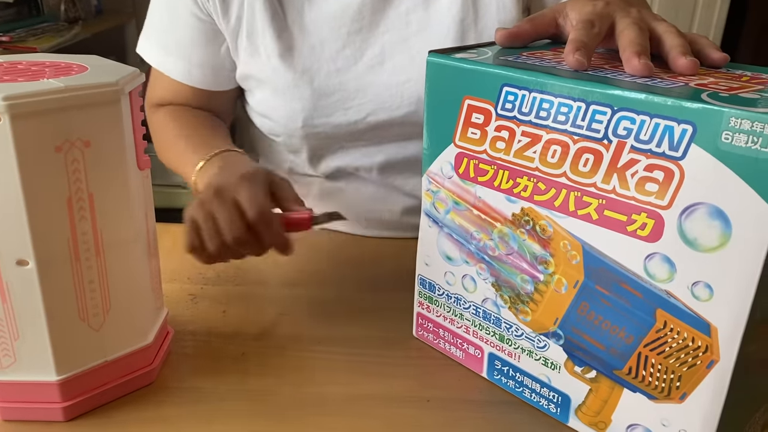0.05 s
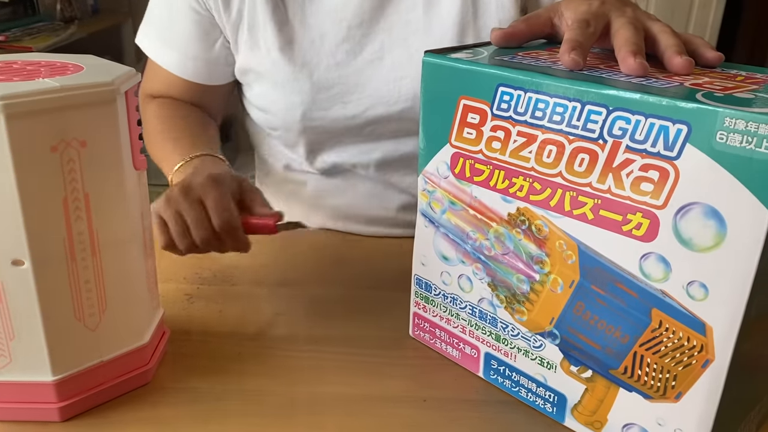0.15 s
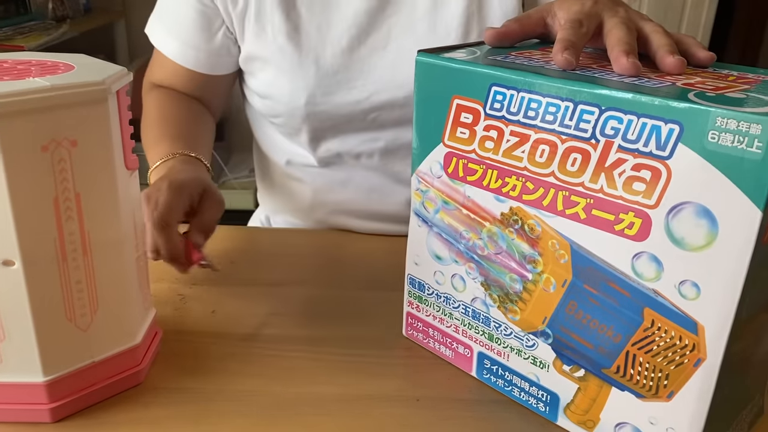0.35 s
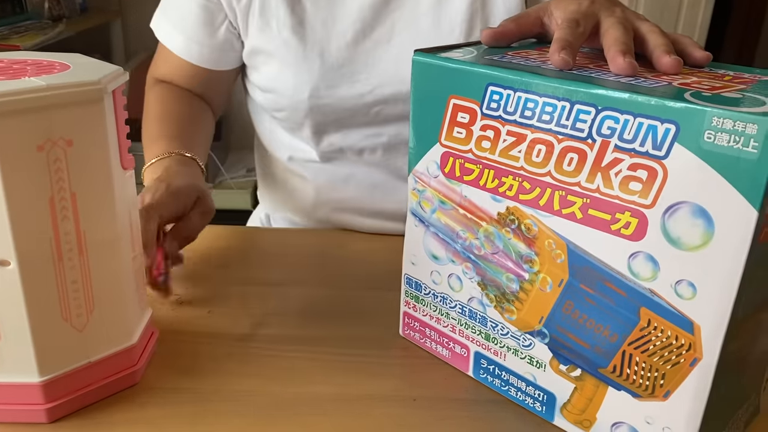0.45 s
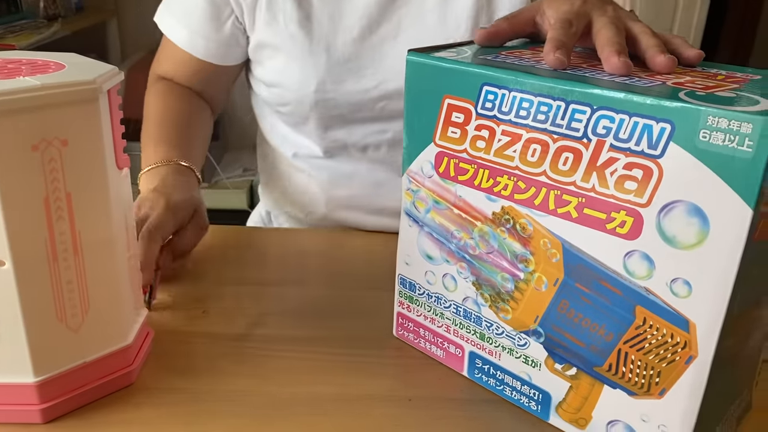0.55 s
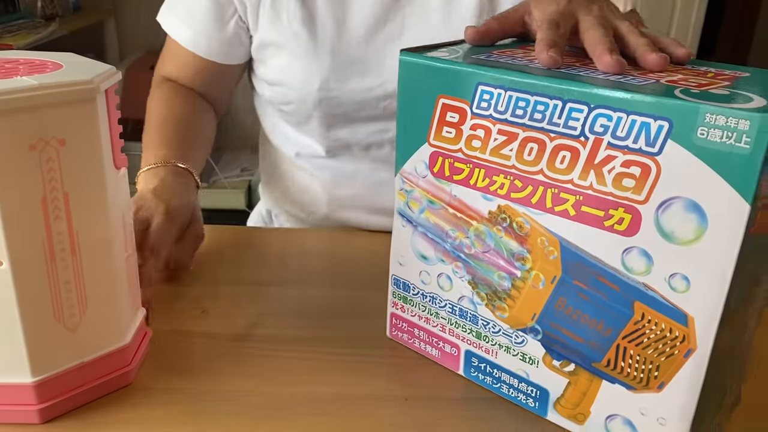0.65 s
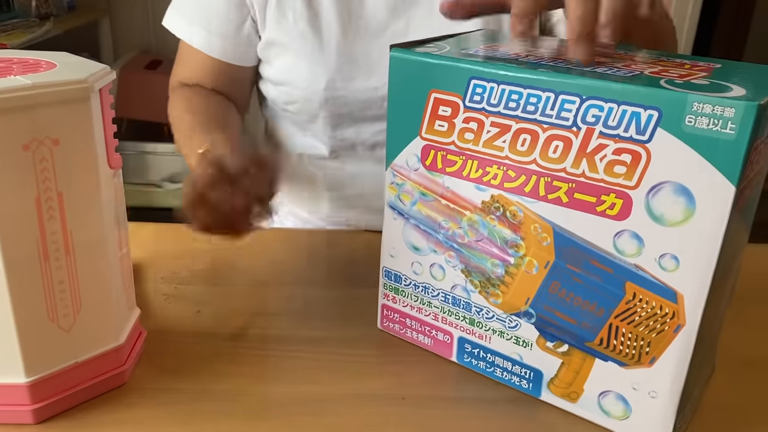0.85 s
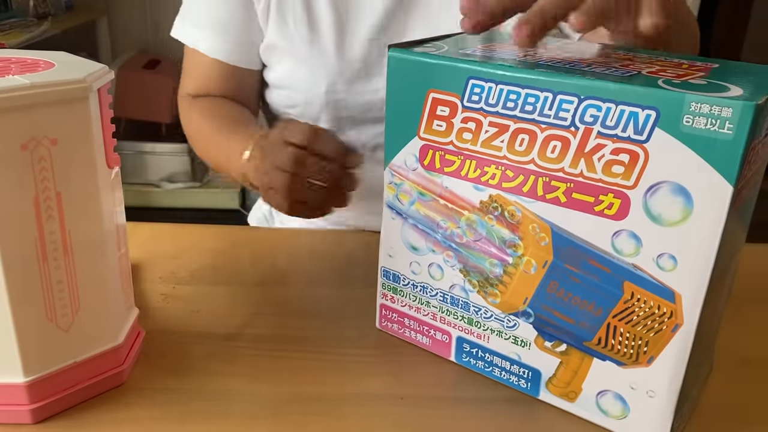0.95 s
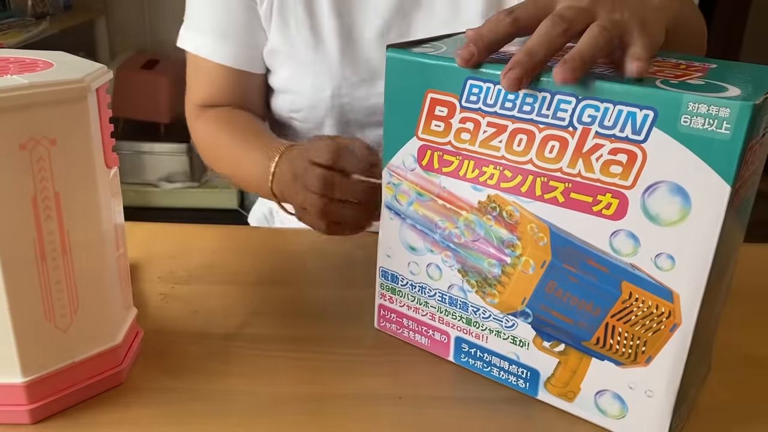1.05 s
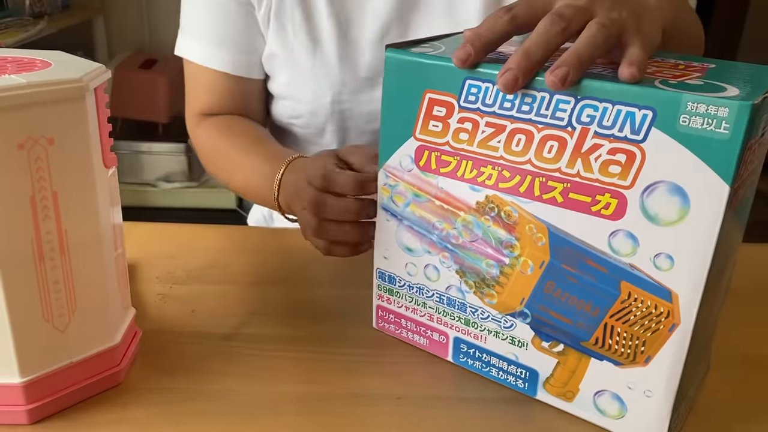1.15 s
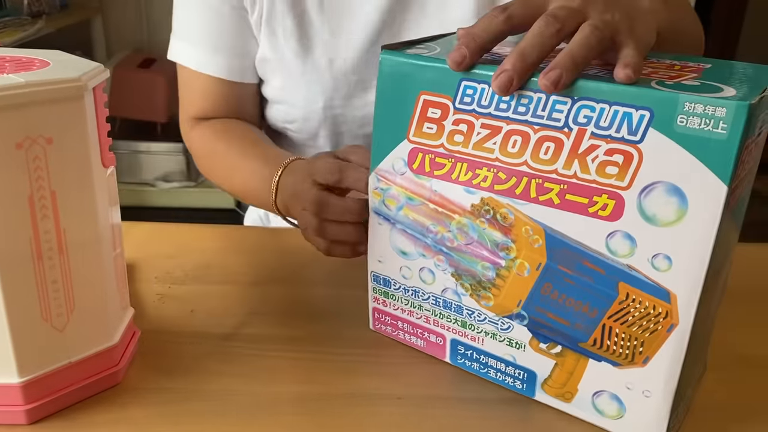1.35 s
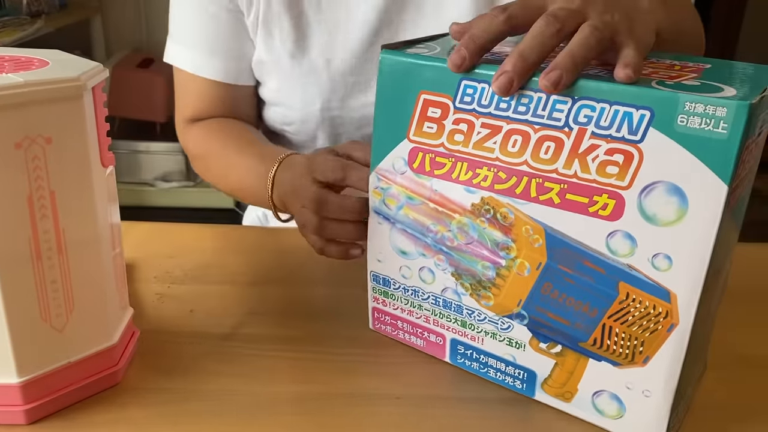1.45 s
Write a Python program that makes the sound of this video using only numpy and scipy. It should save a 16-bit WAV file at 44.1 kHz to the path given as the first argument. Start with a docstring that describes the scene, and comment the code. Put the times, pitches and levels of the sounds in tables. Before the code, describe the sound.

Quick cutter blade clicks, a clatter on wood, and hollow bumps of a cardboard box.

```python
"""A snap-off cutter's blade slides back, its spring clicking into nine notches and ringing the handle.
The cutter then drops on a wooden table and rattles to rest, each bounce sounding wood and plastic.
A hand shifts a large cardboard box, which lands on two edges so that its big panels boom.
There are light ticks and soft rubs. It is all heard close by, in a small, lively room with a low hum."""
import sys
import numpy as np
from scipy import signal
from scipy.fft import rfft, irfft
from scipy.io import wavfile

SR = 44100
rng = np.random.default_rng(int(sys.argv[2]) if len(sys.argv) > 2 else 0)


def wrap_up_sound(samples):
    """Save the sound to the file named by the first command line argument, as 16-bit audio."""
    columns = np.atleast_2d(samples).T
    # keep every value between -1 and 1, then stretch to whole-number steps
    tamed = np.clip(columns, -1, 1)
    steps = np.round(tamed * 32767).astype(np.int16)
    wavfile.write(sys.argv[1], SR, steps)


N = 66150
T = np.arange(SR // 4) / SR  # the clock for one short sound, in seconds


def amp(db):
    """Turns decibels (dB) into a number to multiply by."""
    return 10 ** (np.asarray(db) / 20)


def unit(x):
    """Scales a sound so that its channels have an average energy of one."""
    return x / np.sqrt(np.mean(np.sum(x ** 2, -1)) + 1e-20)


def read(points, hz):
    """Reads between the rows of a table, giving every octave equal space."""
    f, value = np.transpose(points)
    return np.interp(np.log(hz + 1), np.log(f + 1), value)


def add(mix, start, sound):
    """Mixes a sound in at its start time in seconds."""
    part = mix[:, round(start * SR):][:, :sound.shape[-1]]
    part += sound[..., :part.shape[1]]


def colour(x, points, size=4096):
    """Makes each frequency louder or softer as a table says, with no sound ahead of its cause."""
    log_gain = np.log(amp(read(points, abs(np.fft.fftfreq(size, 1 / SR)))))
    taps = np.fft.ifft(np.exp(np.conj(signal.hilbert(log_gain)))).real[:size // 2]
    return signal.fftconvolve(x, taps[None], axes=1)[:, :x.shape[1]]


def dull(x, hz):
    """Gently softens the treble above hz: a higher value leaves a brighter sound."""
    r = np.exp(-2 * np.pi * hz / SR)
    return signal.lfilter([1 - r], [1, -r], x)


def noise(count, width):
    """Left and right noise: the same at width 0, unrelated at width 1."""
    mid, side = rng.standard_normal((2, count))
    return np.array([mid + width * side, mid - width * side])


def fade(t, fade_s):
    """Stays full until t is zero, then falls by 60 dB in each fade time, fade_s."""
    return np.exp(-np.log(1000) * np.maximum(t, 0) / fade_s)


def burst(tone, hold_s, fade_s, width):
    """A contact chatters for a moment, then dies away in so many tones that they blur into noise."""
    return unit(colour(noise(len(T), width) * fade(T - hold_s, fade_s), tone))


def ring(tones, spread_db=0, detune=0):
    """A struck object's fading tones; spread_db and detune vary their strength and pitch by chance."""
    hz, db, fade_s = np.transpose(tones)[:, :, None]
    strength, shift = rng.standard_normal((2, *hz.shape))
    phase = 2 * np.pi * hz * (1 + detune * shift) * T + np.pi * np.arange(len(hz))[:, None]
    rise = 1 - np.exp(-T / 0.0003)
    loudness = amp(db + spread_db * strength) * fade(T, fade_s) * rise
    return unit((loudness * np.sin(phase)).sum(0))


def pan(x, balance):
    """Leans each frequency to the left or right."""
    lean_db = read(balance, np.fft.rfftfreq(N, 1 / SR))
    return irfft(rfft(x) * amp(np.outer([.5, -.5], lean_db)), N)


def out_of_step(x):
    """Sound reaches two closely spaced microphones slightly out of step."""
    # Each row: frequency in Hz, angle in radians by which the left side leads.
    left_lead = [(330, -1.14), (600, 1.58), (1500, 1.5), (2600, 0.77), (4200, 0), (5300, -1.9),
                 (6200, -0.75), (7900, 4), (9700, 0.13), (10900, -1.1), (11900, -4.5), (13700, -5),
                 (16000, -9.5)]
    angle = read(left_lead, np.fft.rfftfreq(N, 1 / SR))
    return irfft(rfft(x) * np.exp(.5j * np.outer([1, -1], angle)), N)


def room(x, tail_db):
    """The room adds a few near echoes and a tail of many blurred ones."""
    # Each row: delay in seconds, left gain, right gain.
    echoes = [(.0092, 0.14, 0.14), (0.0202, -.06, .07)]
    # Each row: frequency in Hz, the tail's fade time in seconds.
    fade_times = [(120, 0.22), (300, 0.38), (700, 0.21), (4000, 0.24), (15000, 0.26)]
    # Each row: frequency in Hz, the tail's boost or cut in dB.
    tail_tone = [(120, -2.5), (290, -10.5), (520, 2.5), (1200, 1.5), (3000, 2.5), (10000, -0.5), (12000, 3),
                 (14000, -0.5)]
    hiss = noise(SR, width=0.54)
    grains = np.sign(hiss) * abs(hiss) ** 1.56  # a power above 1 makes single echoes stand out
    hz, t, bands = signal.stft(grains, SR, nperseg=256)
    bands = bands + (bands.mean(0) - bands) / (1 + (hz[:, None] / 350) ** 4)  # centres the bass
    tail = signal.istft(bands * fade(t, read(fade_times, hz)[:, None]), SR, nperseg=256)[1]
    rise = np.minimum(np.arange(tail.shape[1]) / SR / 0.0022, 1)
    response = amp(tail_db) * colour(unit(tail * rise), tail_tone)
    pulse = signal.unit_impulse(len(T))
    bright_echo = pulse - dull(pulse, 1200)  # small nearby surfaces reflect only the treble
    for delay, left, right in echoes:
        add(response, delay, np.outer([left, right], bright_echo))
    return x + signal.fftconvolve(x, response, axes=1)[:, :N]


def background():
    """Low room rumble, faint hiss and a steady hum."""
    # Each row: frequency in Hz, the noise's boost or cut in dB.
    air_tone = [(15, -15.5), (55, -3.5), (125, -2.5), (220, 0), (350, -10.5), (600, -19.5), (1200, -27.5),
                (2200, -31), (4200, -32), (5200, -32), (6500, -44), (16000, -60.5)]
    air_db, hum_hz, hum_db = -51, 54.7, -48
    hiss = noise(N + SR, width=0.48) + 0.64 * np.diff(noise(N + SR + 1, width=1.0))
    air = colour(hiss, air_tone)[:, SR:]
    hum = np.sin(2 * np.pi * hum_hz * np.arange(N) / SR)
    return amp(air_db) * np.sqrt(N) * unit(air) + amp(hum_db) * hum


def light_ticks():
    """Light ticks of plastic and card, including the crisp edge of the box's bumps."""
    # Each row: start in seconds, level in dB, fade time in seconds, brightness in Hz.
    ticks = [(.049, -33.5, 0.013, 2500), (.134, -32, 0.069, 3020), (0.6018, -14.5, 0.024, 15000),
             (1.053, -27.5, 0.048, 1000), (1.086, -37, 0.0062, 2490), (1.139, -26.5, 0.0056, 15000),
             (1.167, -25.5, 0.0185, 3920), (1.195, -32.5, 0.087, 15000)]
    # Each row: frequency in Hz, boost or cut in dB.
    tick_tone = [(300, -14), (2500, -10), (4200, 0.5), (6000, -0.5), (8000, -3.5), (10000, -1.5),
                 (12200, -14.5), (14500, 2.5), (17000, -20.5)]
    out = np.zeros((2, N))
    for start, db, fade_s, bright_hz in ticks:
        tick = burst(tick_tone, 0, fade_s, width=0.54)
        add(out, start, amp(db) * unit(dull(tick, bright_hz)))
    return out_of_step(out)


def rubs():
    """Hands, sleeves and the box rub: a soft scrape swells and fades over a low shudder."""
    # Each row: start in seconds, length in seconds, scrape level in dB, shudder level in dB.
    slides = [(0.361, 0.24, -18, -18.5), (1.05, 0.064, -25.5, -6.5), (1.236, 0.056, -12.5, -17),
              (1.266, 0.085, -22.5, -10)]
    # Each row of both tables: frequency in Hz, boost or cut in dB.
    scrape_tone = [(100, -7.5), (240, 17), (600, -3), (1400, -5), (5000, -19), (16000, -29.5)]
    shudder_tone = [(30, -4), (80, -2), (200, -11.5), (1200, -65)]
    out = np.zeros((2, N))
    for start, length, scrape_db, shudder_db in slides:
        rub = noise(len(T), width=0.19) * np.sin(np.pi * np.minimum(T / length, 1)) ** 2
        add(out, start, amp(scrape_db) * unit(colour(rub, scrape_tone)))
        add(out, start, amp(shudder_db) * unit(colour(rub, shudder_tone)))
    return out


def box_bumps():
    """A box edge taps the table, and a wave bends through the card and sets the big panels booming."""
    # Each row: start in seconds, boom level in dB, tap level in dB, tap brightness in Hz.
    bumps = [(1.015, -17.5, -29.5, 1500), (1.052, -8.5, -16.5, 4000), (1.086, -19, -22.5, 2000),
             (1.1393, 11.5, -1.5, 2800), (1.1667, 6, 0, 1300), (1.436, -16, -21, 1500),
             (1.472, -17, -23, 1000)]
    # The panels' low tones. Each row: pitch in Hz, relative level in dB, fade time in seconds.
    panels = [(77, -11, 0.094), (113, -6.5, 0.072), (159.6, 3, 0.0315), (288.7, -11.5, 0.11)]
    # The edge's tap. Each row: frequency in Hz, boost or cut in dB.
    tap_tone = [(100, 0.5), (600, -14), (1050, 0), (1600, -9.5), (2800, -17.5), (3300, -24.5), (16000, -65)]
    # The wave's treble arrives first, so its pitch falls.
    start_hz, end_hz, fall_s, peak_s = 1071, 261, 0.00369, 0.01004
    glide_hz = end_hz + (start_hz - end_hz) * np.exp(-T / fall_s)
    swell = np.minimum(T / peak_s, 1) ** 1.6 * fade(T - peak_s, fade_s=0.043)
    boom = swell * np.sin(2 * np.pi * np.cumsum(glide_hz) / SR)
    t = np.maximum(T - peak_s * 0.877, 0)  # the panels join just before the wave peaks
    rise = 1 - np.exp(-(t / 0.0028) ** 2)
    for hz, db, fade_s in panels:
        boom += amp(db) * rise * fade(t, fade_s) * np.sin(2 * np.pi * hz * t)
    out = np.zeros((2, N))
    for start, boom_db, tap_db, bright_hz in bumps:
        tap = burst(tap_tone, hold_s=0.0023, fade_s=0.012, width=0.41)
        add(out, start, amp(boom_db) * unit(boom) + amp(tap_db) * unit(dull(tap, bright_hz)))
    return out


def cutter_bounces():
    """Each bounce thumps the table, leaves a duller ring in it and clacks the cutter's plastic shell."""
    # Each row: start in seconds, wood level in dB, wood brightness in Hz,
    # clack level in dB, clack brightness in Hz, contact length in seconds.
    bounces = [(0.6372, 3, 2500, -2.5, 9000, 0.0014), (0.6498, 12, 2150, 2, 12000, 0.0018),
               (0.705, 6.5, 2220, -3, 6000, 0.0021), (0.7398, -5.5, 3500, -8.5, 3000, 0.0013),
               (0.7567, -12, 2970, -4, 6000, 0.0028), (0.7585, 3.5, 3500, 8.5, 16000, 0.0026),
               (0.8004, -2.5, 4060, -2.5, 3500, .0015), (0.8205, -4, 3560, -5.5, 3000, 0.004)]
    # Clear ringing tones. Each row of both: pitch in Hz, relative level in dB, fade time in seconds.
    table_tones = [(493, -10, 0.1), (613, -0.5, 0.057), (830, 1.5, 0.054), (1021, 5, 0.033),
                   (1226, -3, 0.062), (1494, -1, 0.097), (1968, 7, 0.024)]
    shell_tones = [(2190, 1, 0.039), (2610, -8, 0.0047), (3580, -1.5, 0.01), (4050, -1.5, 0.016),
                   (4890, -5.5, 0.015), (5800, -4.5, 0.011), (7840, 6.5, 0.0137)]
    # The noisy blur of crowded tones. Each row of both: frequency in Hz, boost or cut in dB.
    wood_blur = [(60, -41), (130, -3.5), (260, -5), (450, 1), (700, 1), (1400, 3), (2200, -1.5), (2800, -4),
                 (6000, -8), (16000, -3.5)]
    shell_blur = [(200, -7.5), (1000, -3), (2500, 1.5), (4400, -2), (5600, 2.5), (6800, -3), (9500, -2),
                  (11000, -0.5), (12200, -24.5), (13500, 0), (15300, -5.5), (16500, -28.5)]
    # Each row: frequency in Hz, left level minus right level in dB.
    balance = [(300, -0.5), (600, 4.5), (1100, -2.5), (2100, 4), (4000, 1.5)]
    out = np.zeros((2, N))
    for start, wood_db, wood_hz, clack_db, clack_hz, hold_s in bounces:
        thump = amp(-0.5) * burst(wood_blur, hold_s, fade_s=0.021, width=0.33)
        after_ring = unit(dull(burst(wood_blur, hold_s, fade_s=0.082, width=0.3), 1800))
        wood = thump + after_ring + amp(1) * ring(table_tones, spread_db=2.0, detune=0.014)
        rattle = burst(shell_blur, hold_s, fade_s=0.015, width=0.36)
        clack = rattle + amp(-5) * ring(shell_tones, spread_db=5.0, detune=0.02)
        add(out, start, amp(wood_db) * unit(dull(wood, wood_hz)))
        add(out, start, amp(clack_db) * unit(dull(clack, clack_hz)))
    return out_of_step(pan(out, balance))


def cutter_ratchet():
    """The slider's spring scrapes over each tooth, snaps into the notch and rings the handle."""
    # The handle's tones shift as the blade moves. Each row: start in seconds, level in dB,
    # low, middle and high pitch in Hz, tilt towards the top treble in dB.
    notches = [(.2376, 2, 5370, 5820, 9900, 1), (0.2727, -3, 3950, 6300, 8920, 0),
               (0.3055, -0.5, 4330, 6170, 9500, 0), (0.3284, -3, 4400, 6800, 8100, -1),
               (0.3474, -0.5, 4840, 5800, 7700, 0), (.3689, -0.5, 4640, 6200, 8700, 1),
               (0.3932, 1, 5160, 6320, 9800, -0.5), (.4192, -1.5, 5700, 6480, 9000, -1),
               (0.4495, 0.5, 4020, 6000, 7140, -0.5)]
    # The handle's low, middle and high tone. Each row: relative level in dB, fade time in seconds.
    handle = [(-8, .008), (3, 0.012), (6, 0.013)]
    # The spring's snap. Each row: frequency in Hz, boost or cut in dB.
    snap_tone = [(200, -33), (1000, -14.5), (2100, -20.5), (3000, -8), (5000, -1), (7600, 1), (9300, 6.5),
                 (11800, -3.5), (13000, 7), (15500, 1.5), (17000, -21)]
    scrape_s, spring_fade_s = 0.00065, 0.009
    hollow_hz, hollow_fade_s = 1455, 0.044
    out = np.zeros((2, N))
    for count, (start, db, *pitches, tilt_db) in enumerate(notches, 1):
        click = amp(-9) * burst(snap_tone, scrape_s, spring_fade_s, width=0.391)  # over the tooth
        snap = burst(snap_tone, hold_s=0.00094, fade_s=spring_fade_s, width=0.4)
        handle_tones = [(hz, *row) for hz, row in zip(pitches, handle)]
        add(click, scrape_s, snap + amp(-4.5) * ring(handle_tones, spread_db=7.0))
        slid_in = count / len(notches)  # the handle's hollow ring grows as the blade slides in
        click += slid_in * amp(-24.5) * ring([(hollow_hz, 0, hollow_fade_s)])
        add(out, start, amp(db) * colour(click, [(6000, -tilt_db), (14000, tilt_db)]))
    return out_of_step(out)


def scene():
    """All the sounds together in the room."""
    clicks = room(cutter_ratchet() + light_ticks(), tail_db=-8)
    bounces = room(cutter_bounces(), tail_db=-7)
    box = room(box_bumps() + rubs(), tail_db=-8.5)
    return clicks + bounces + box + background()


def record(dry):
    """The microphone loses the deepest bass and the very highest treble."""
    low_cut_hz, high_cut_hz = 47, 16600
    thinned = signal.sosfilt(signal.butter(2, low_cut_hz, "high", fs=SR, output="sos"), dry)
    treble_cut = signal.firwin(255, high_cut_hz, window=("kaiser", 9), fs=SR)
    return signal.oaconvolve(thinned, treble_cut[None], "same")


dry = scene()
out = record(dry)
wrap_up_sound(out)
```